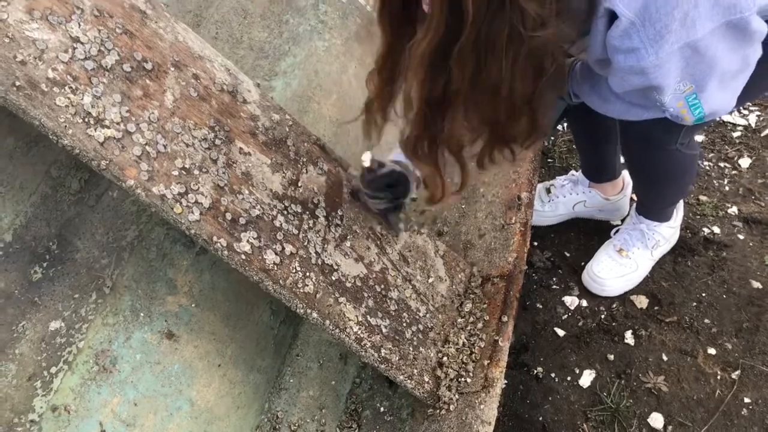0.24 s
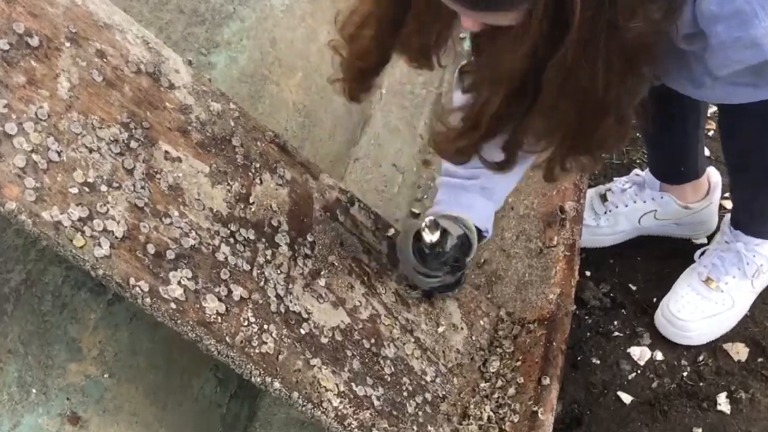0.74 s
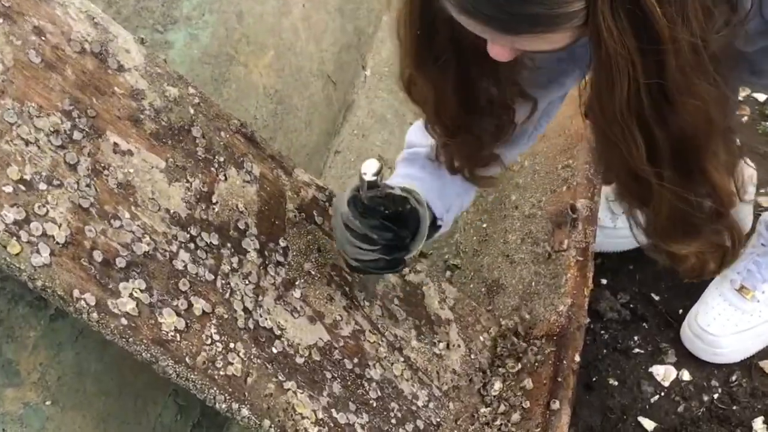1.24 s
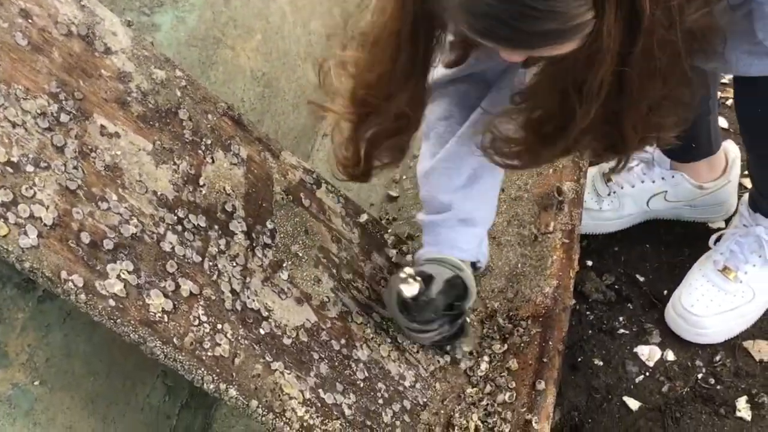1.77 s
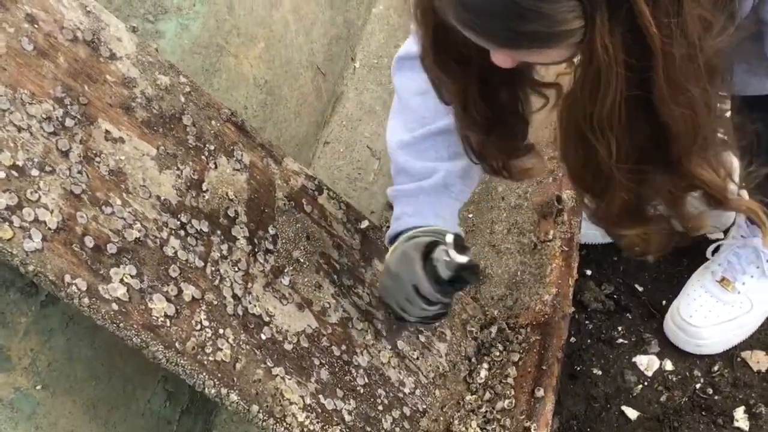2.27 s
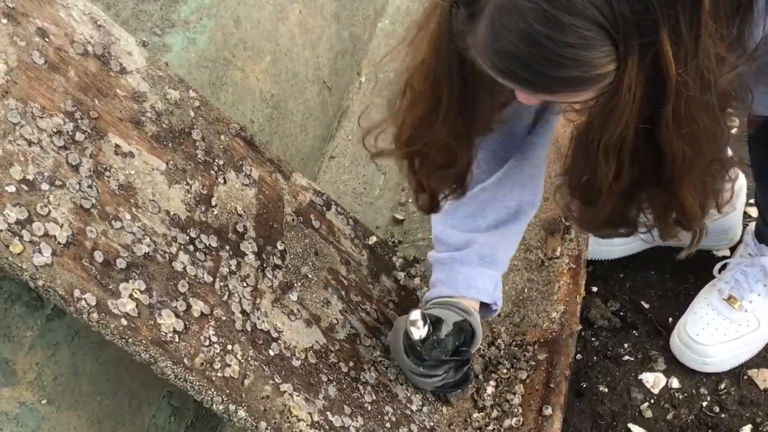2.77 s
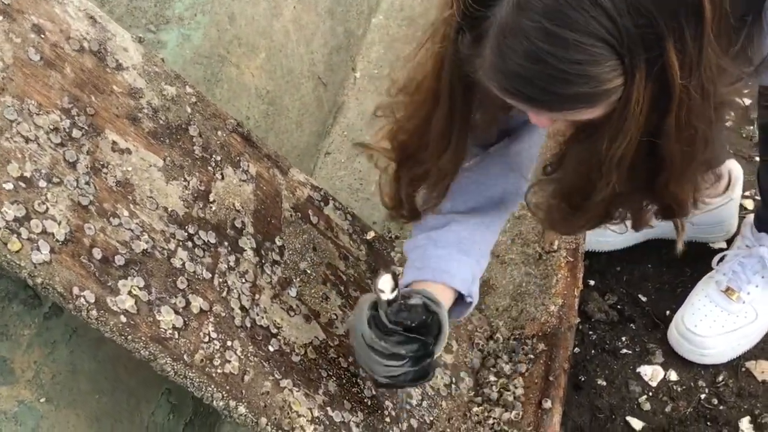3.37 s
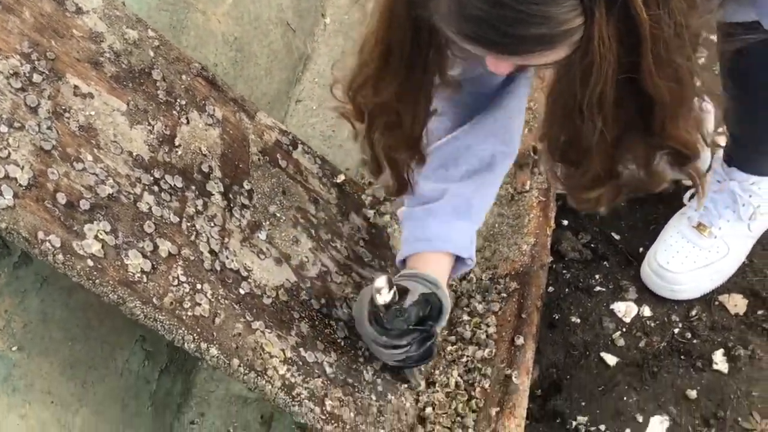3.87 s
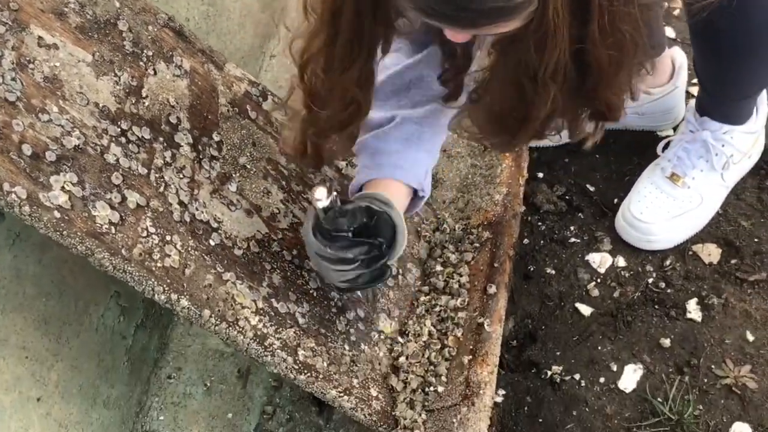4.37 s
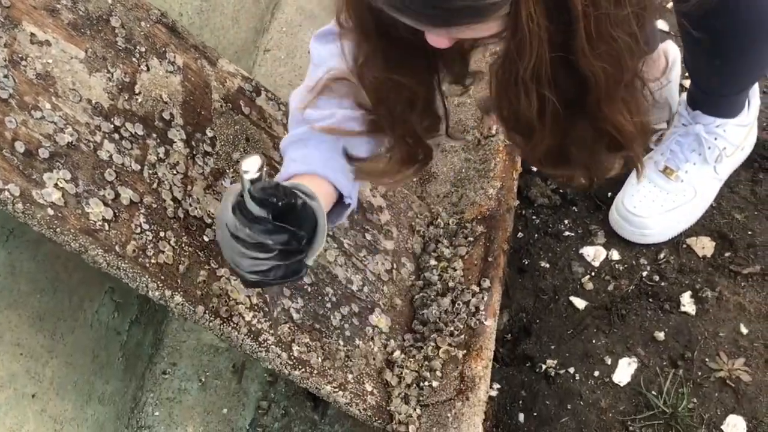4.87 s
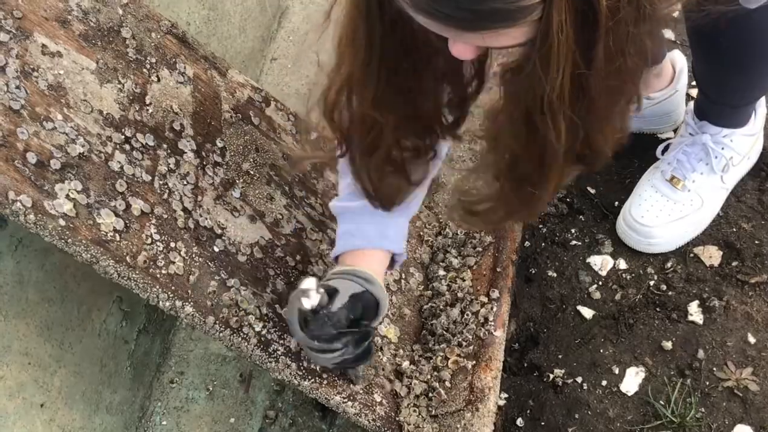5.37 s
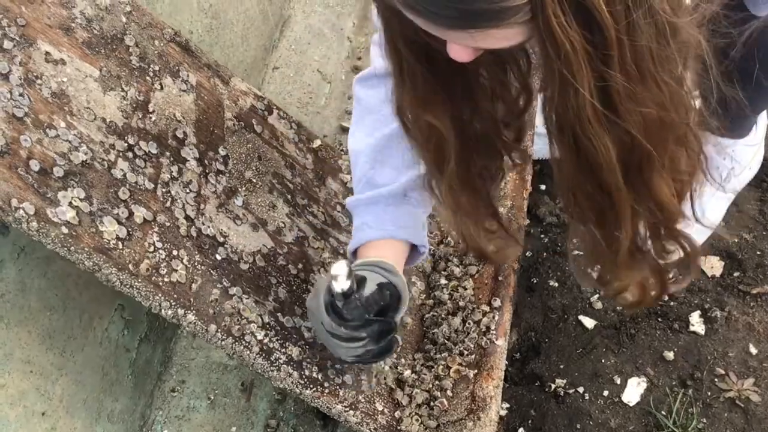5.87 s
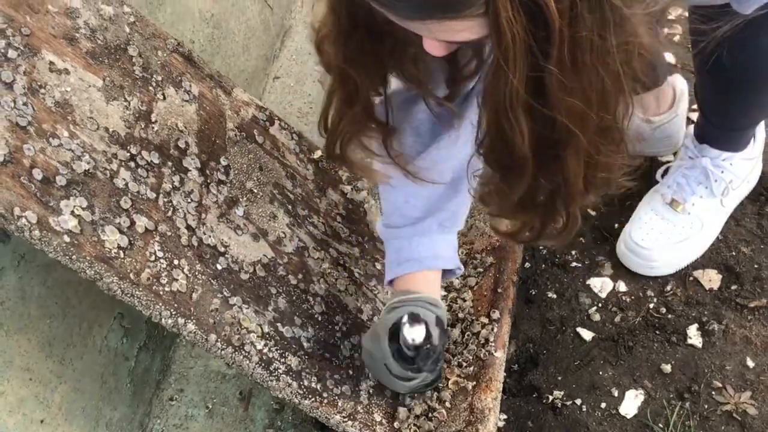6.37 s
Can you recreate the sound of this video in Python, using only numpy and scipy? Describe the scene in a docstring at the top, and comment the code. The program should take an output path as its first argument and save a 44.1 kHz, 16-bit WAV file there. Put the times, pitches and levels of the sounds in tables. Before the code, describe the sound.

A steel scraper jabs through crusty shells on a fibreglass boat seat, cracking and crunching in short strokes, with chips pattering and light wind outdoors.

```python
"""A steel hand scraper is jabbed along the barnacled seat of a fibreglass boat, outdoors.
Each stroke is filtered noise clicks grinding through the crust, with louder bursts where big shells crack.
The same clicks drive decaying tones: the steel blade and the seat ring, the hull booms.
Crumbs and chips are clicks that land after the strokes. Wind is shaped noise with short buffets.
A few far-off birds are gliding, fluttering sines, over a faint bed of air noise."""
import sys
import numpy as np
from scipy import signal
from scipy.fft import rfft, irfft
from scipy.io import wavfile
from scipy.ndimage import uniform_filter1d

SR = 44100
rng = np.random.default_rng(int(sys.argv[2]) if len(sys.argv) > 2 else 0)


def unload_wav(signal):
    """Save mono or channel-first audio to the path in sys.argv[1] as 16-bit WAV at rate SR, clipped to [-1, 1]."""
    wavfile.write(
        sys.argv[1],
        SR,
        np.round(np.clip(np.atleast_2d(signal).T, -1, 1) * 32767).astype(np.int16),
    )


N = 292812
TIME = np.arange(N) / SR   # seconds

# Blade in contact: (start [s], length [s], grit level [dB], seat ring over grit [dB],
# hull boom over seat ring [dB], fine splinters [dB])
STROKES = [(0.214, 0.1, -33, 1.5, -3.5, -1.5), (0.586, 0.141, -38, 6, -6.5, 1.5),
           (0.958, 0.13, -37, 6.5, -4.5, 3.5), (1.332, 0.13, -39.5, 10.5, -4.5, 2.5),
           (1.702, 0.072, -38.5, 9, -4, -1), (2.053, 0.02, -56, 14.5, 3, 6),
           (2.118, 0.13, -59.5, 15.5, -2, 11), (2.625, 0.077, -33, 6.5, -8, 0),
           (3.018, 0.075, -35.5, 9.5, -8, 2), (3.45, 0.054, -39.5, 5.5, 1, 4),
           (3.83, 0.028, -34.5, 3, -3, 4.5), (4.162, 0.034, -37, 12, -4, 0),
           (4.488, 0.041, -29.5, 1.5, -9.5, 2), (4.986, 0.04, -24, -1, 0.5, 2.5),
           (5.286, 0.058, -68.5, 15, 12.5, -5.5), (5.361, 0.036, -25.5, -7, -3, -3),
           (5.693, 0.029, -34.5, 6, 4.5, 3), (6.031, 0.034, -31, 5.5, 1.5, 1.5),
           (6.313, 0.03, -28, 3.5, -6, 0)]
# Colour of breaking shell: (frequency [Hz], relative level [dB])
SHELL = [(300, 1), (700, -4), (1300, 0), (1950, -0.5), (2900, -3), (4300, 1), (5000, -8.5), (7000, -5),
         (7900, -9.5), (9200, -5), (10500, -11.5), (11500, -8.5), (15800, -13)]


def from_db(db):
    """Turn decibels into a gain."""
    return 10 ** (np.asarray(db) / 20)


def rms_one(x):
    """Scale to unit power."""
    return x / np.sqrt(np.mean(x ** 2) + 1e-20)


def through(x, response):
    """Pass a signal through an impulse response scaled to unit energy."""
    return signal.fftconvolve(x, response / np.linalg.norm(response))[:N]


def colour(x, spectrum, size=8192):
    """Shape the tone with a filter that never sounds before its input (minimum phase)."""
    hz, db = np.transpose(spectrum)
    grid = np.maximum(np.arange(size // 2 + 1) * SR / size, 1)
    gain = from_db(np.interp(np.log(grid), np.log(hz), db))
    # folding the cepstrum moves all the energy to the front of the response
    cepstrum = irfft(np.log(gain))
    cepstrum[1:size // 2] *= 2
    cepstrum[size // 2 + 1:] = 0
    return through(x, irfft(np.exp(rfft(cepstrum))))


def shelf(x, gain, corner_hz):
    """Scale the treble above a corner."""
    treble = signal.lfilter(*signal.butter(1, corner_hz, "high", fs=SR), x)
    return x + (gain - 1) * treble


def ring(x, modes):
    """Drive a set of decaying tones (modes), each starting a quarter turn after the one before."""
    t = TIME[:SR // 2]
    response = np.zeros(len(t))
    for k, (hz, db, t60) in enumerate(modes):
        decay = from_db(db - 60 * t / t60)
        response += decay * np.sin(2 * np.pi * hz * t + k * np.pi / 2)
    return through(x, response)


def evened(x, span_s):
    """Hold the short-term power at one."""
    power = uniform_filter1d(x ** 2, max(int(span_s * SR), 2))
    return x / np.sqrt(np.abs(power) + 1e-9)


def grains(per_s, spread_db):
    """Random clicks of very uneven size."""
    clicks = (rng.random(N) < per_s / SR) * rng.standard_normal(N)
    return clicks * from_db(spread_db * rng.standard_normal(N))


def drift(per_s):
    """Smooth random wander of unit spread, with a given number of new targets per second."""
    knots = rng.standard_normal(N // 4)
    return rms_one(np.interp(TIME * per_s, np.arange(len(knots)), knots))


def bursts(times, levels_db, rise_s, fall_s):
    """Power envelope of events that swell and die away."""
    t = TIME[:SR // 4]
    shape = (1 - np.exp(-t / rise_s)) * np.exp(-t / fall_s)
    power = np.zeros(N + len(t))
    for s, db in zip(times, levels_db):
        at = max(int(s * SR), 0)
        power[at:at + len(t)] += (from_db(db) * shape / shape.max()) ** 2
    return power[:N]


def echoes(x, delay_s, t60, wet_db, top_hz):
    """Diffuse reflections: a fading noise tail, duller than the direct sound."""
    t = TIME[:SR]
    tail = rng.standard_normal(SR) * (t > delay_s) * from_db(-60 * t / t60)
    dull = np.exp(-2 * np.pi * top_hz / SR)
    return from_db(wet_db) * signal.lfilter([1 - dull], [1, -dull], through(x, tail))


def distant_air():
    """Steady faint noise, strongest in the low tones."""
    # colour of the air: (frequency [Hz], relative level [dB])
    air_colour = [(180, -12), (300, -2), (372, -5.5), (517, -13.5), (781, -16), (1240, -20), (2040, -26.5),
                  (4280, -32), (4960, -36.5), (15500, -40)]
    return from_db(-55) * colour(rng.standard_normal(N), air_colour)


def wind():
    """Gusts push a lumpy rumble, and short eddies burst on the microphone port."""
    # strength of the gusts: (time [s], relative level [dB])
    gusts = [(0.0, -22.5), (0.31, -27.5), (0.42, -37), (0.74, -31.5), (0.81, -39), (1.22, -21), (1.46, -39),
             (1.5, -23), (2.0, -36), (2.09, -27.5), (2.14, -39.5), (2.31, -21.5), (2.35, -40),
             (2.57, -18.5), (2.77, -44.5), (3.1, -34.5), (3.92, -25), (3.98, -33), (4.21, -31.5),
             (4.35, -45.5), (4.86, -23), (4.94, -39), (5.07, -34), (5.25, -45), (5.49, -35.5),
             (5.68, -45.5), (5.77, -30.5), (5.84, -43), (6.25, -34), (6.64, -30)]
    # sharp buffets: (time [s], relative peak level [dB])
    buffets = [(0.067, -21.5), (0.149, -18), (0.536, -23.5), (1.135, -26), (1.184, -13.5), (1.223, -19),
               (1.331, -16), (1.655, -28), (2.031, -25.5), (2.258, -23), (2.303, -20), (2.417, -16.5),
               (2.497, -18), (2.527, -23.5), (2.555, -23.5), (2.592, -10.5), (3.251, -23.5), (3.341, -22.5),
               (3.582, -24), (3.721, -25), (3.8, -27.5), (4.1, -23), (4.62, -23), (4.704, -20),
               (4.752, -21), (4.797, -10), (4.848, -21.5), (6.149, -29), (6.248, -25.5), (6.27, -20)]
    # colour of the rumble: (frequency [Hz], relative level [dB])
    rumble_colour = [(15, -26), (25, -25), (45, 2.5), (70, 3), (120, 0.5), (200, -11.5), (300, -22),
                     (500, -42.5), (1000, -76)]
    # colour of the buffets: (frequency [Hz], relative level [dB])
    buffet_colour = [(20, -28.5), (50, -4.5), (110, 2), (230, 3.5), (350, -9), (550, -32), (900, -45),
                     (1500, -76.5)]
    wind_db, lump_db, lumps_per_s = 1, 3, 22   # turbulence rides on the gusts
    gust_db = np.interp(TIME, *np.transpose(gusts)) + lump_db * drift(lumps_per_s)
    rumble = evened(colour(rng.standard_normal(N), rumble_colour), span_s=.05)
    rumble = rumble * from_db(wind_db + gust_db)
    s, db = np.transpose(buffets)
    eddies = evened(colour(rng.standard_normal(N), buffet_colour), span_s=0.0039)
    push = np.sqrt(bursts(s - .002, db - 2.0, rise_s=0.0086, fall_s=0.0066))
    # stronger eddies are brighter: 0.37 dB of treble per dB of push away from -20 dB
    treble_gain = np.clip(push / from_db(-20), .1, 2) ** 0.37
    return rumble + push * shelf(eddies, treble_gain, corner_hz=350)


def call(start, length, contour_hz, db, rasp_hz):
    """One bird note: a fluttering sine that swells and fades along a smooth arc of pitch."""
    u = np.linspace(0, 1, int(length * SR))   # progress through the note
    arc = np.polyfit(np.linspace(0, 1, len(contour_hz)), contour_hz, len(contour_hz) - 1)
    hz = np.polyval(arc, u) + rasp_hz * drift(640)[:len(u)]
    swell = np.sqrt(2 * np.sin(np.pi * u))
    note = from_db(db) * swell * np.sin(2 * np.pi * np.cumsum(hz) / SR)
    return np.pad(note, (int(start * SR), N))[:N]


def birds():
    """Low arched cries, falling slurs and thin level whistles, each a gliding tone with faint echoes."""
    # low arched cries of a distant bird: (time [s], level [dB])
    cries = [(1.581, -59), (1.875, -66), (2.544, -61), (2.89, -60.5)]
    # falling slurs of a songbird: (time [s], level [dB])
    slurs = [(5.621, -58), (5.87, -60), (6.125, -63)]
    # level whistles and buzzes: (time [s], length [s], pitch [Hz], level [dB], rasp [Hz])
    whistles = [(4.066, .086, 3900, -62, 15), (4.313, 0.13, 7380, -81, 27), (4.738, 0.15, 7170, -70, 61),
                (5.067, 0.15, 4600, -62.5, 305), (5.31, 0.033, 5760, -61, 23), (5.43, 0.13, 4640, -69, 190)]
    cry_hz, slur_hz = (1170, 1431, 1170), (4400, 3900, 3080)   # pitch at start, middle and end
    out = np.zeros(N)
    for s, db in cries:
        out += call(s, 0.11, cry_hz, db, rasp_hz=10)
    for s, db in slurs:
        out += call(s, 0.048, slur_hz, db, rasp_hz=130)
    for s, length, hz, db, rasp_hz in whistles:
        out += call(s, length, [hz], db, rasp_hz)
    return out + echoes(out, delay_s=0.019, t60=0.28, wet_db=-3, top_hz=7000)


def fractures(vary_db, count=9):
    """Dense tiny breaks at steady power; every shell has its own size and favours different resonances."""
    x = grains(per_s=11000, spread_db=4)
    for hz in np.geomspace(2600, 14500, count):
        resonance = signal.lfilter(*signal.iirpeak(hz, 6, fs=SR), x)
        x = x + resonance * (from_db(vary_db * drift(70).clip(-2, 2)) - 1)
    return evened(x, span_s=.004)


def seat_ring(x):
    """The crust and the pressing blade damp the panel, so no mode rings for long."""
    # seat panel and blade: (frequency [Hz], relative level [dB], undamped time to fall 60 dB [s])
    seat_modes = [(893.5, -3.5, 0.07), (945.6, -0.5, 0.18), (1014, -2, 0.15), (1161, -6.5, 0.088),
                  (1237, 1.5, 0.02), (1253, 3, 0.037), (1475, 0.5, 0.046), (1460, -9.5, 0.08),
                  (1624, 0, 0.036), (1923, -15, 0.087), (2225, -2, 0.025), (2560, -12.5, 0.091),
                  (2670, -19.5, .05)]
    longest_ring_s = .06
    return ring(x, [(hz, db, min(t60, longest_ring_s)) for hz, db, t60 in seat_modes])


def small_chips(count=2):
    """Each stroke throws small chips, which land at random times soon after it ends."""
    loudest_db, range_db = -36, 12   # relative level
    shortest_flight_s, longest_flight_s = 0.036, .12
    lift_s = np.repeat([start + length for start, length, *_ in STROKES], count)
    height, smallness = rng.random((len(lift_s), 2)).T
    flight_s = shortest_flight_s + (longest_flight_s - shortest_flight_s) * height
    return np.column_stack([lift_s + flight_s, loudest_db - range_db * smallness])


def debris(snap):
    """Crumbs fly off each stroke and patter down a moment later; larger chips click and skitter."""
    # large chips landing: (time [s], relative peak level [dB])
    large_chips = [(0.0813, -30), (0.1276, -29), (0.1394, -24.5), (0.176, -31.5), (0.4249, -24.5),
                   (0.468, -29), (0.4848, -28), (0.539, -38.5), (0.8987, -33.5), (1.1773, -35),
                   (1.2027, -31.5), (1.5422, -28), (1.889, -24.5), (1.9366, -29.5), (2.074, -40),
                   (2.2777, -31.5), (2.8421, -29), (3.602, -31.5), (3.907, -26.5), (4.2732, -28.5),
                   (4.3008, -31), (4.5828, -29), (4.7236, -33.5), (5.1312, -31), (5.435, -32), (5.827, -34),
                   (6.4524, -27.5), (6.6108, -28)]
    flight = np.maximum(TIME[:SR // 2] - .03, 0)   # nothing lands in the first 30 ms
    landing = flight * np.exp(-flight / 0.021)
    shower = np.abs(signal.fftconvolve(snap ** 2, landing / landing.sum())[:N])
    patter = evened(grains(per_s=1800, spread_db=4), span_s=.03)
    crumbs = from_db(-33.5) * np.sqrt(shower) * patter
    s, db = np.vstack([large_chips, small_chips()]).T
    chip_level = np.sqrt(bursts(s - .001, db - 13.0, rise_s=0.00041, fall_s=0.0068))
    landed = crumbs + chip_level * fractures(vary_db=2.5)
    return colour(landed, SHELL) + from_db(-7.5) * seat_ring(landed)


def jams():
    """A sudden stop gives the hull a short judder that dies within a few cycles."""
    # blade jamming against the seat: (time [s], relative level [dB], judder [Hz])
    stops = [(4.521, -6, 577), (5.019, -25, 278), (5.384, -28, 249), (5.712, -27, 255), (6.068, -30.5, 257),
             (6.340, -19.5, 675)]
    push = np.zeros(N)
    for s, db, hz in stops:
        cycles = np.clip((TIME - s) * hz, 0, 20)
        push += from_db(db) * np.sin(2 * np.pi * cycles) * np.exp(-cycles / 2)
    return push


def hull_boom(blow, hull_gain, crunch):
    """The low part of the blows and the jams set the hull's slow modes ringing."""
    # hull: (frequency [Hz], relative level [dB], time to fall 60 dB [s])
    hull_modes = [(198.1, -2.5, 0.19), (231.6, -0.5, 0.16), (281.2, 0.5, 0.13), (340, -10, 0.24),
                  (389, 4, 0.08), (495.6, -1.5, 0.067), (585.5, -6.5, 0.089), (661.6, -0.5, 0.081),
                  (790, 0.5, .06)]
    heave = evened(colour(crunch, [(60, -14), (190, 7.5), (700, -10), (1600, -15.5)]), span_s=0.0032)
    return from_db(-12.5) * ring(blow * hull_gain * heave + from_db(10.5) * jams(), hull_modes)


def seat_panel(blow, bite, crunch):
    """A hard bite drives the seat's upper modes, a soft one its lower modes."""
    # heavily damped laminate between the modes: (frequency [Hz], relative level [dB])
    laminate = [(200, -19), (500, -11), (800, -6.5), (1200, 11.5), (1600, -4), (2000, -10.5), (2500, -9),
                (3500, -3), (6000, -29)]
    soft = colour(crunch, [(300, -9.0), (800, 0.5), (1250, -0.5), (1700, -12.5), (4000, -23.5)])
    hard = colour(fractures(vary_db=2), [(600, -17.5), (1300, -3.0), (1600, 2.5), (2400, 2.5), (5000, -13.5)])
    force = blow * evened(soft + from_db(5.0) * bite * hard, span_s=0.0014)
    return from_db(-12.5) * seat_ring(force) + from_db(-14.0) * colour(force, laminate)


def blade_ring(flex, crunch):
    """The steel rings in step with each snap, driven by the chatter of its edge."""
    # steel blade, damped by the glove: (frequency [Hz], relative level [dB], time to fall 60 dB [s])
    blade_modes = [(3120, -9, 0.1), (3300, 0.5, 0.029), (3430, -2, 0.025), (4040, 4, 0.02),
                   (4190, 7.5, 0.013), (4330, 5, 0.026), (4420, 2, 0.033), (5570, -2, 0.055)]
    chatter = evened(colour(crunch, [(1500, -25), (3000, -5.0), (5000, 1), (9000, -12.0)]), span_s=0.0017)
    return from_db(-10.5) * ring(flex * chatter, blade_modes)


def catching_edge():
    """The edge catches and slips, nicking off small flakes: uneven power that averages one."""
    snaps_per_s, uneven_db, flake_spread_db = 130, 2.2, 4.0
    when, size = rng.random((int(snaps_per_s * N / SR), 2)).T
    flake_db = flake_spread_db * np.minimum(-np.log(size), 3)
    flakes = bursts(when * N / SR, flake_db, rise_s=.0005, fall_s=.002)
    catching = from_db(uneven_db * drift(160)) ** 2 + flakes
    return catching / catching.mean()


def grinding():
    """Power of the blade's drag in shell and seat, the hull's share, the bite and the splintering."""
    dig_db_per_s, land_s, lift_s = 54.5, 0.0034, .002   # the blade digs in deeper as it travels
    jab_bite_db, bite_loss_db_per_s = 1, 38.5   # short jabs bite hard, long drags softly
    usual_grit_db, bite_follows = -36, 0.25   # the bite hardens with the push: dB per dB of grit
    grit, seat, bite, splinters = np.zeros(N), np.zeros(N), np.ones(N), np.ones(N)
    hull_gain = np.full(N, from_db(-30))   # share of a knock reaching the hull before the first stroke
    for start, length, grit_db, seat_db, hull_db, splinters_db in STROKES:
        age = TIME - start
        lifting = np.exp(-np.maximum(age - length, 0) / lift_s).clip(1e-9)
        contact = np.clip(age / land_s, 0, 1) * lifting
        depth_db = dig_db_per_s * (np.clip(age, 0, length) - length / 2)
        power = (contact * from_db(grit_db + depth_db)) ** 2
        grit += power
        seat += power * from_db(seat_db) ** 2
        # these hold until the next stroke starts
        bite_db = jab_bite_db - bite_loss_db_per_s * length + bite_follows * (grit_db - usual_grit_db)
        hull_gain[age >= 0] = from_db(hull_db)
        bite[age >= 0] = from_db(bite_db)
        splinters[age >= 0] = from_db(splinters_db)
    catching = catching_edge()
    return grit * catching, seat * catching, hull_gain, bite, splinters


def scraper():
    """Each crack is a run of tiny fractures that sets the steel blade, the seat and the hull ringing."""
    # large shells breaking: (time [s], relative snap level [dB], relative seat ring level [dB])
    cracks = [(0.0603, -22, -25), (0.2196, -37, -13), (0.252, -7.5, -22.5), (0.2597, -4.5, -8.5),
              (0.2657, -11.5, -9), (0.3191, -32, -12.5), (0.641, -11, -29), (0.6804, -12, -30),
              (0.684, -8.5, -8.5), (0.9687, -21.5, -23), (1.0043, -21, -19), (1.0205, -14, -20),
              (1.0314, -11.5, -13), (1.059, -12, -41), (1.3673, -11, -24), (1.4324, -10.5, -38),
              (1.4486, -11.5, -33), (1.7402, -17.5, -13), (1.7773, -8.5, -11), (1.7907, -5, -13.5),
              (1.7974, -7, -16.5), (1.82, -9, -9), (2.1836, -31, -27), (2.206, -32, -24),
              (2.2184, -34, -32), (2.2938, -26, -33.5), (2.6369, -15, -38), (2.667, -5.5, -20),
              (2.6745, -14, -16.5), (2.6984, -11.5, -11.5), (3.0405, -12.5, -27), (3.055, -5.5, -34),
              (3.062, -8.5, -3), (3.07, -14.5, -7), (3.0842, -28.5, -8), (3.452, -20.5, -14),
              (3.4806, -12.5, -22), (3.493, -15, -12), (3.8451, -6.5, -22), (3.8489, -6.5, -9.5),
              (3.863, -27.5, -7), (4.175, -5, -18), (4.1814, -4.5, -7.5), (4.4886, -13.5, -26),
              (4.4952, -8.5, -7), (4.5133, -6.5, -12), (4.5216, -9.5, -7), (4.9926, -36, -35.5),
              (5.02, -11, -4.5), (5.3752, -9.5, -27), (5.3816, -4.5, -10.5), (6.0352, -9.5, -28),
              (6.0452, -12, -17), (6.064, -22, -20), (6.328, -8, -7), (6.3382, -24, -5)]
    s, snap_db, ring_db = np.transpose(cracks)
    grit, seat, hull_gain, bite, splinters = grinding()
    # how hard the shell snaps, the blade flexes and the seat is struck
    snap = np.sqrt(grit + bursts(s - .001, snap_db - 8, rise_s=.002, fall_s=.0025))
    flex = np.sqrt(from_db(-13.5) * grit + bursts(s - .001, snap_db - 11.5, rise_s=.0008, fall_s=.003))
    blow = np.sqrt(seat + bursts(s - .001, ring_db - 2.0, rise_s=0.00023, fall_s=0.0064))
    crunch = fractures(vary_db=2.5)
    # thin shell splinters brighter than thick
    shells = shelf(colour(snap * crunch, SHELL), splinters, corner_hz=8400)
    body = blade_ring(flex, crunch) + seat_panel(blow, bite, crunch) + hull_boom(blow, hull_gain, crunch)
    return shells, body, snap


def scene():
    """The work in the open hull, a faint return from the yard, wind, birds and distant air."""
    shells, body, snap = scraper()
    crunch = shells + debris(snap)
    # the sharp crunch bounces around inside the boat
    work = body + crunch + echoes(crunch, delay_s=0.005, t60=0.052, wet_db=-8.0, top_hz=11000)
    yard = echoes(work, delay_s=0.0036, t60=0.24, wet_db=-21.5, top_hz=4000)
    return (work + yard + wind() + birds() + distant_air())[None]


def record(dry):
    """Peaks stop at full scale, then everything above 16 kHz is cut."""
    low_pass = signal.ellip(12, .2, 80, 16000, fs=SR, output="sos")
    return signal.sosfilt(low_pass, np.clip(dry, -1, 1))


dry = scene()
out = record(dry)
unload_wav(out)
```